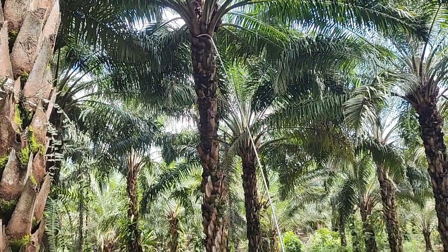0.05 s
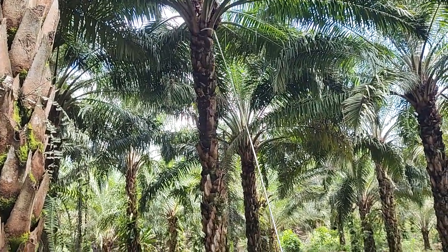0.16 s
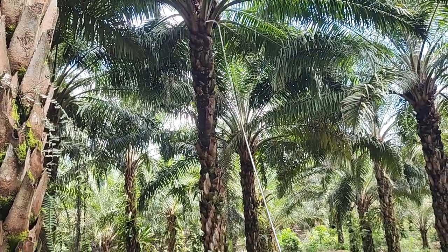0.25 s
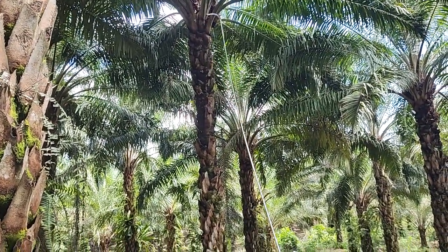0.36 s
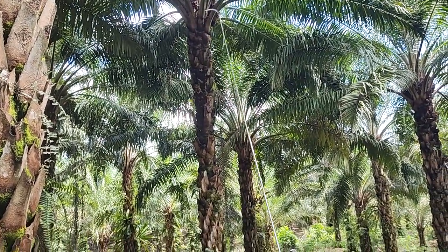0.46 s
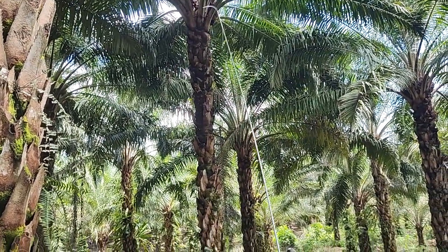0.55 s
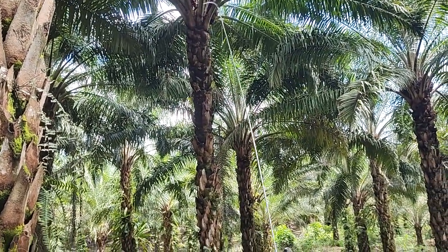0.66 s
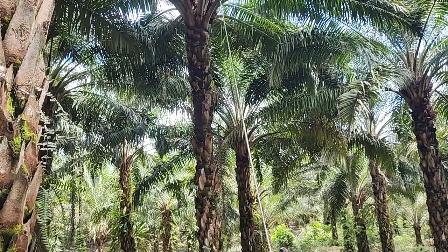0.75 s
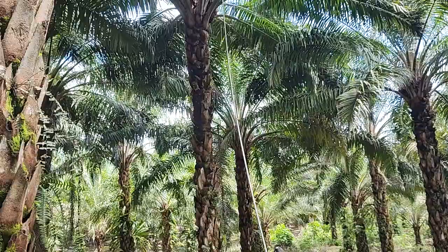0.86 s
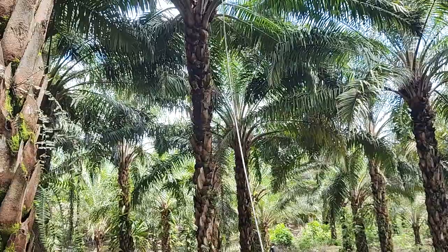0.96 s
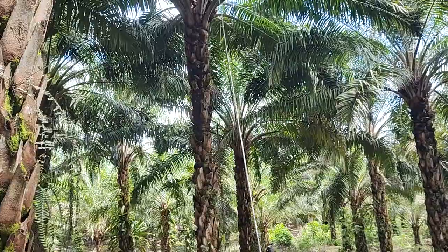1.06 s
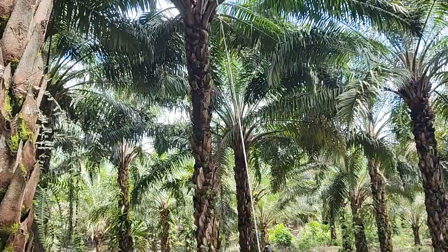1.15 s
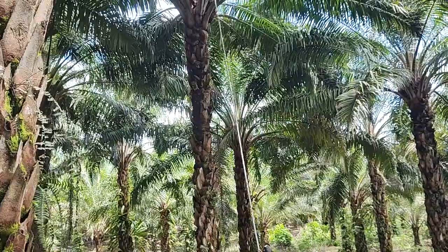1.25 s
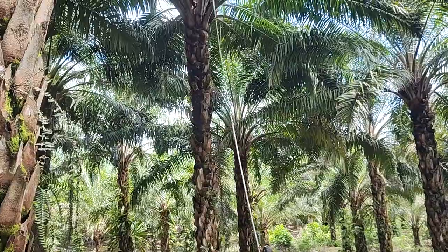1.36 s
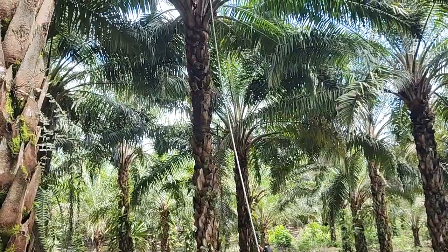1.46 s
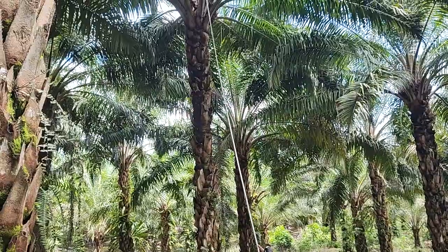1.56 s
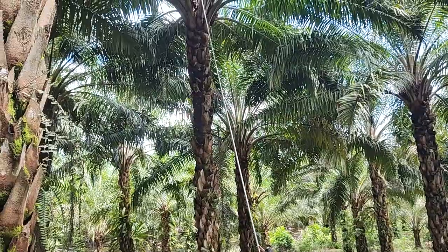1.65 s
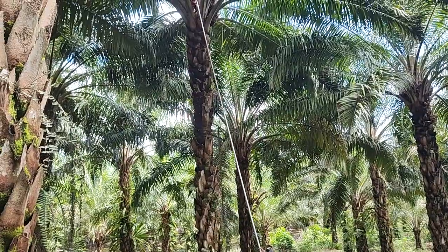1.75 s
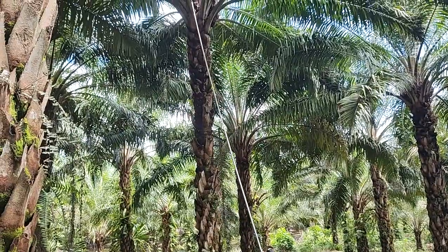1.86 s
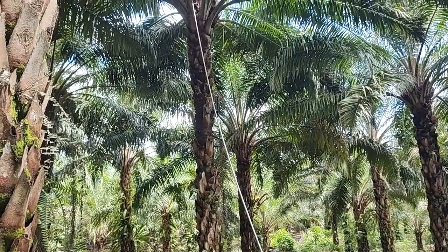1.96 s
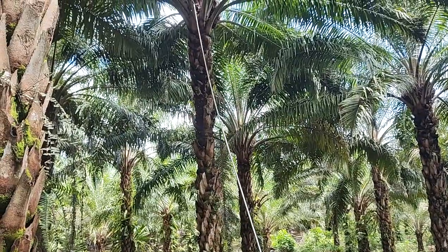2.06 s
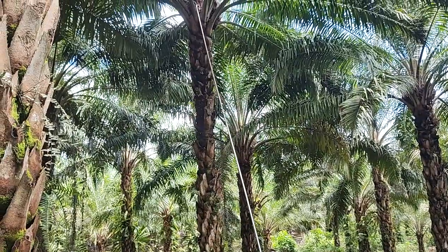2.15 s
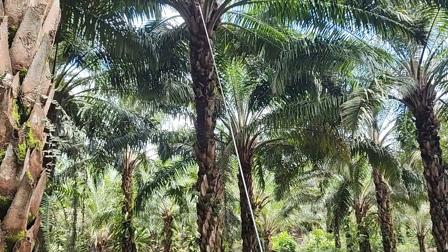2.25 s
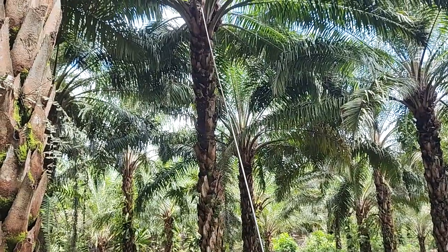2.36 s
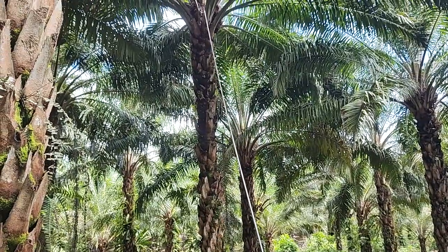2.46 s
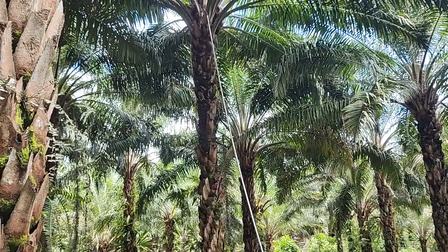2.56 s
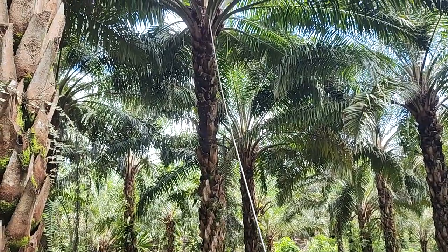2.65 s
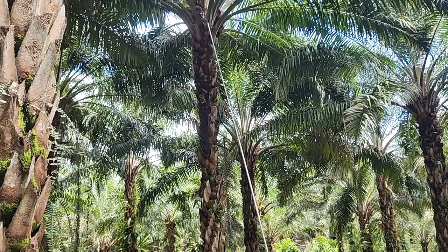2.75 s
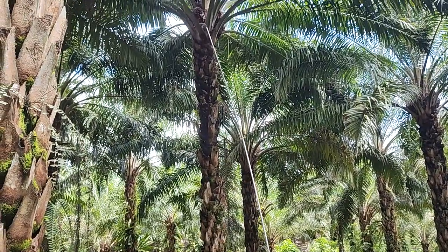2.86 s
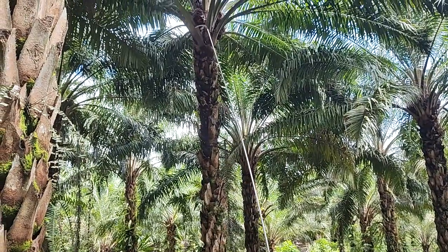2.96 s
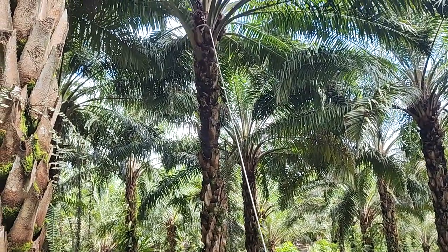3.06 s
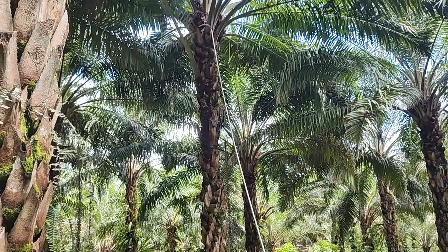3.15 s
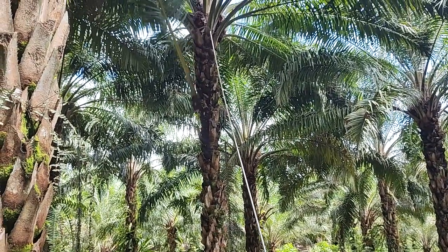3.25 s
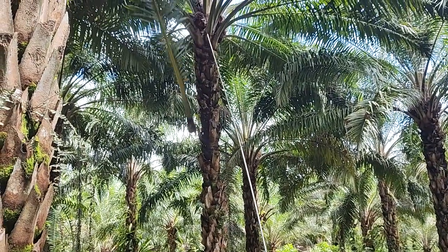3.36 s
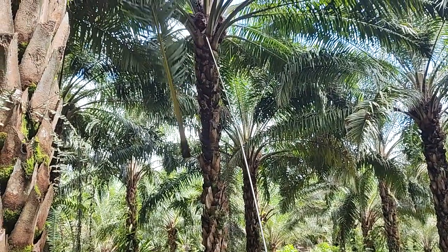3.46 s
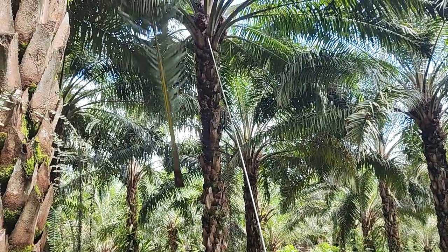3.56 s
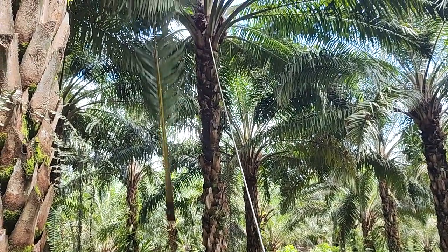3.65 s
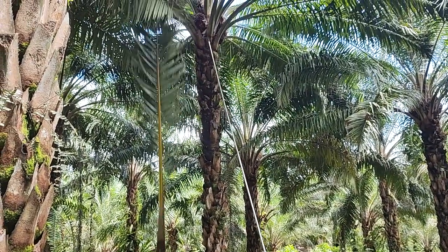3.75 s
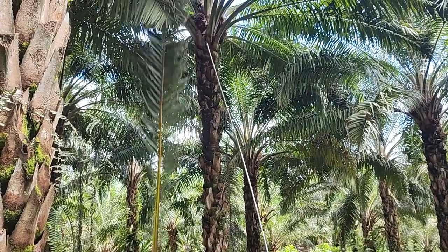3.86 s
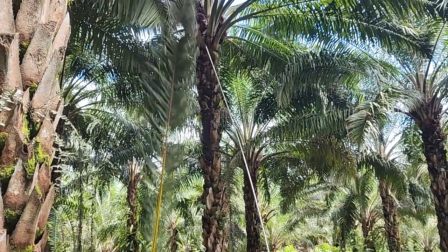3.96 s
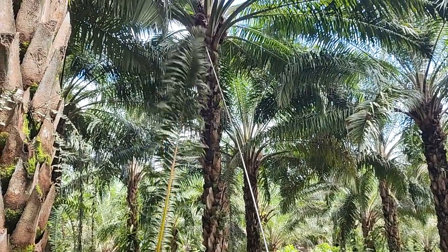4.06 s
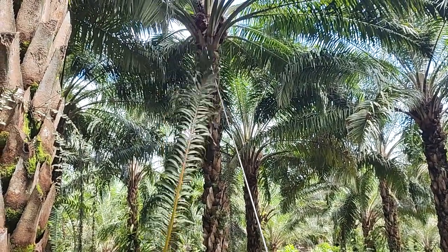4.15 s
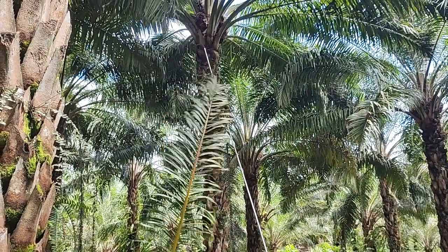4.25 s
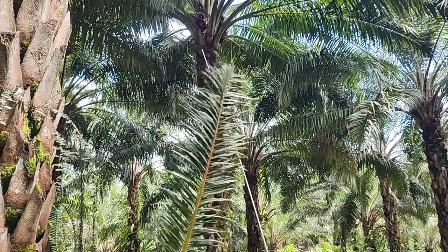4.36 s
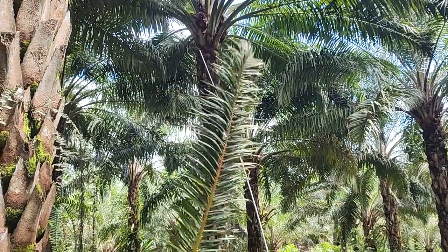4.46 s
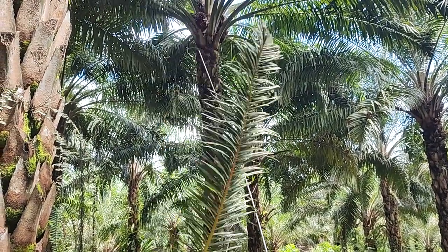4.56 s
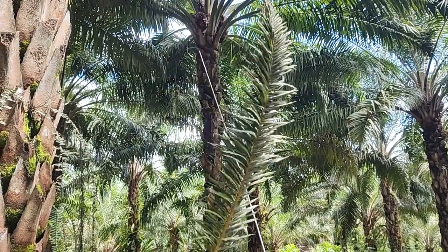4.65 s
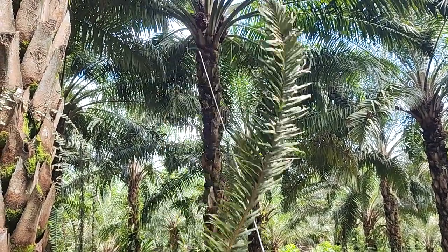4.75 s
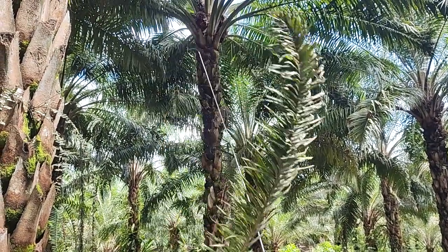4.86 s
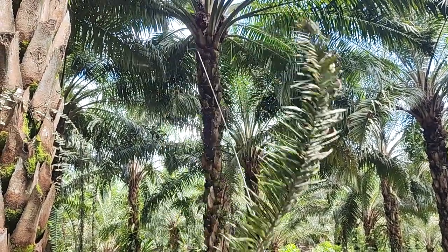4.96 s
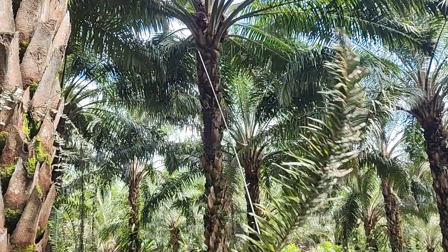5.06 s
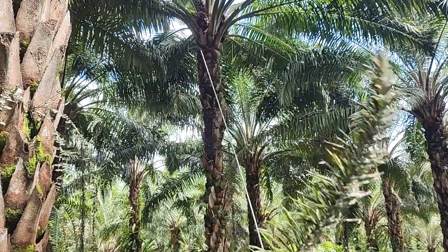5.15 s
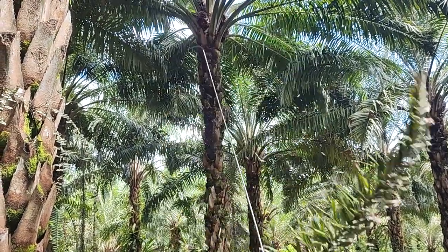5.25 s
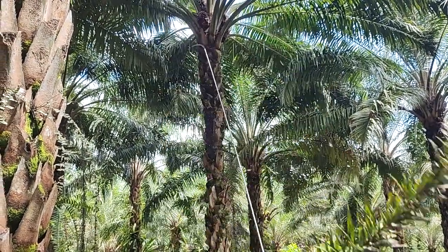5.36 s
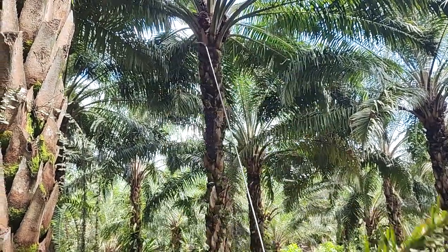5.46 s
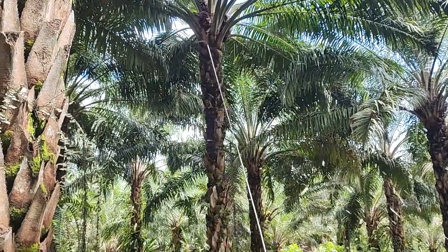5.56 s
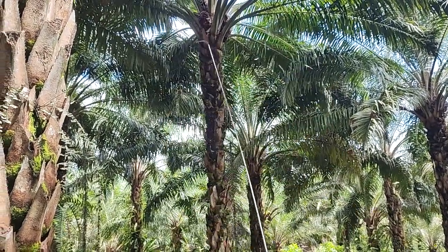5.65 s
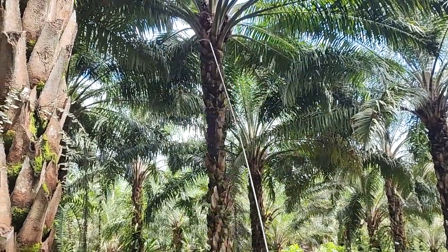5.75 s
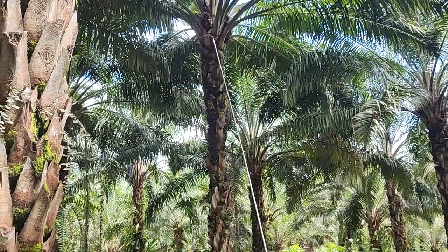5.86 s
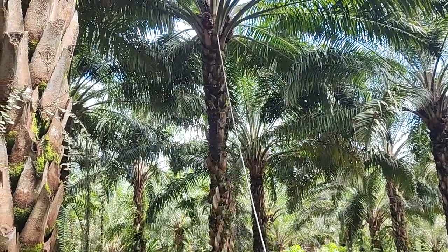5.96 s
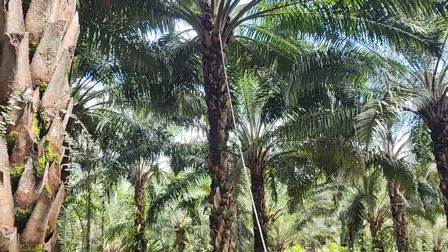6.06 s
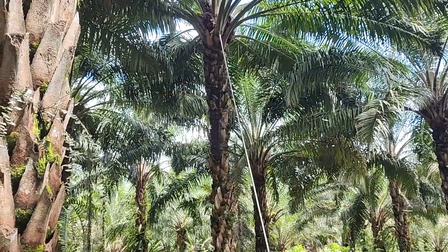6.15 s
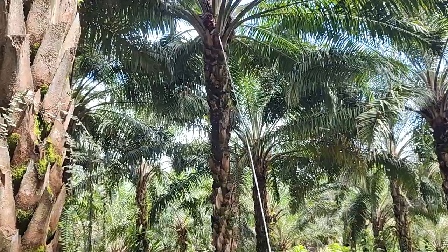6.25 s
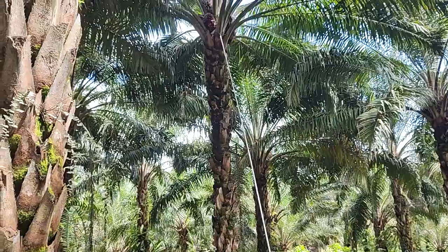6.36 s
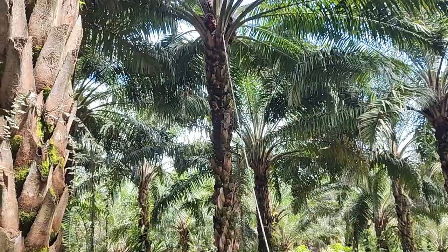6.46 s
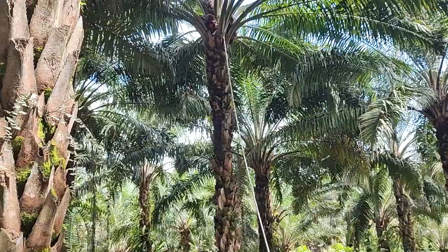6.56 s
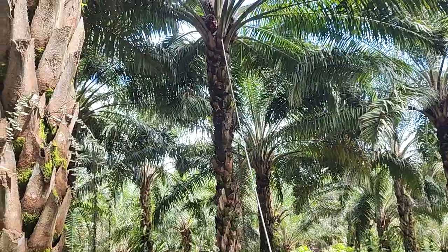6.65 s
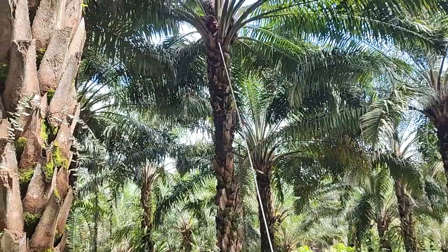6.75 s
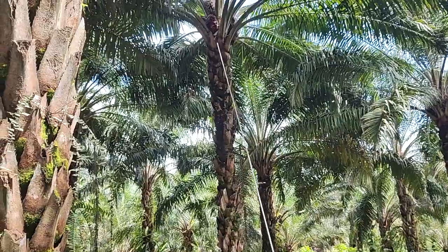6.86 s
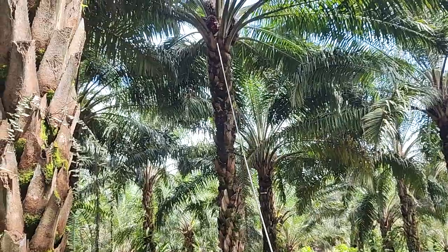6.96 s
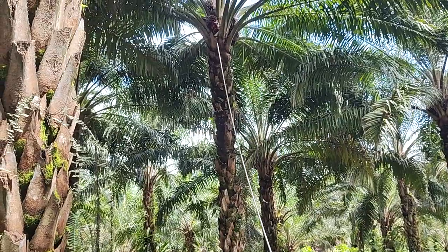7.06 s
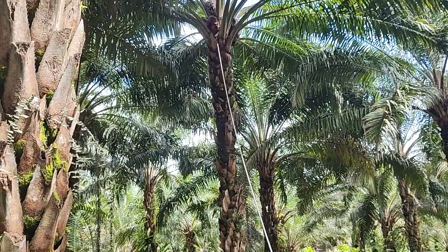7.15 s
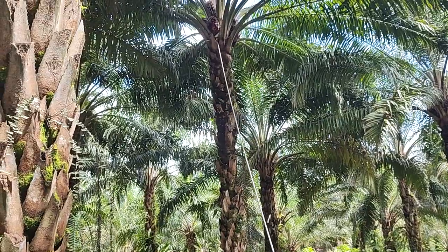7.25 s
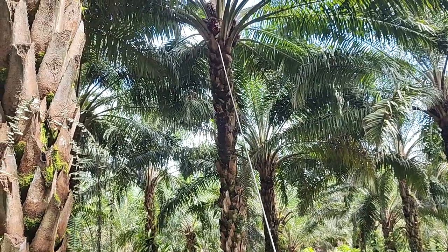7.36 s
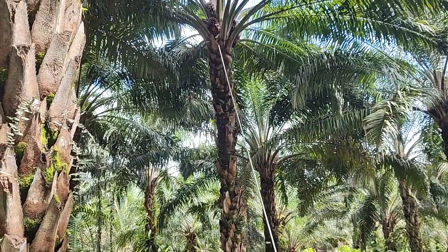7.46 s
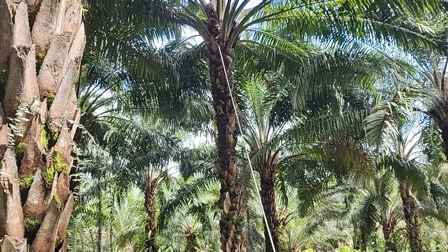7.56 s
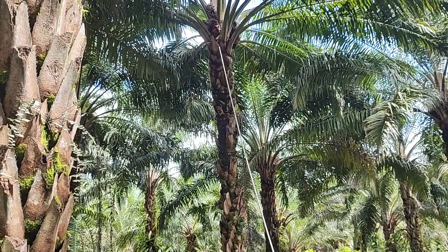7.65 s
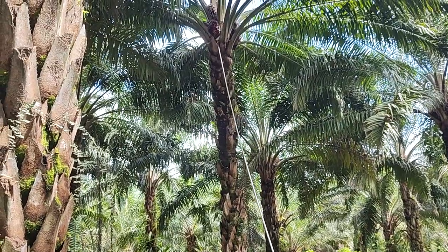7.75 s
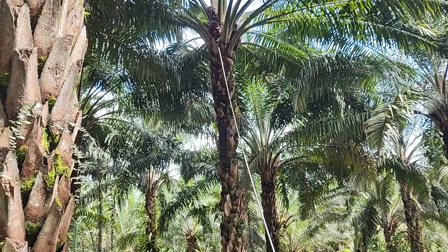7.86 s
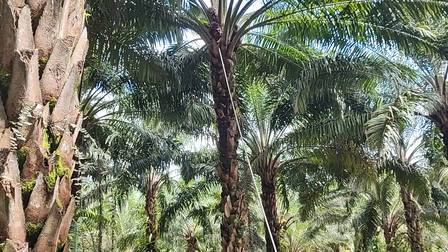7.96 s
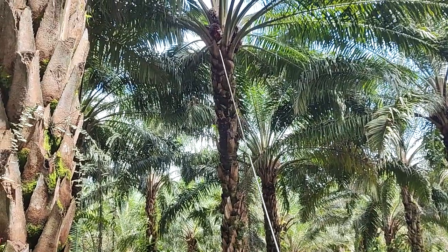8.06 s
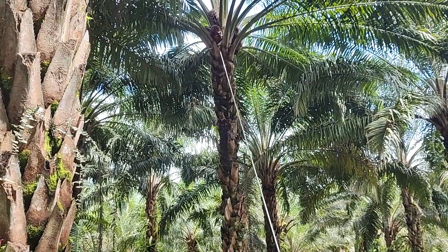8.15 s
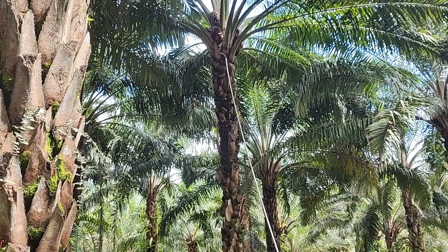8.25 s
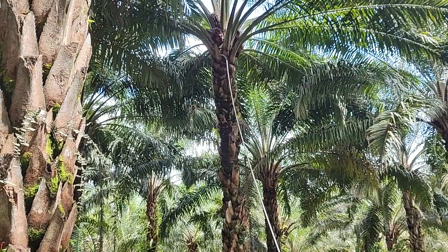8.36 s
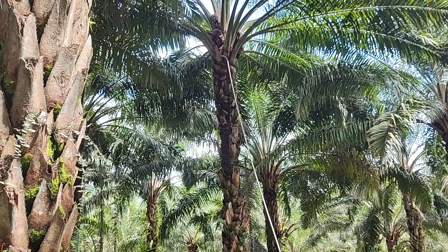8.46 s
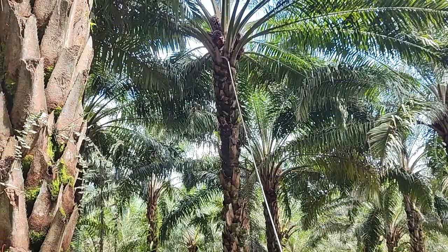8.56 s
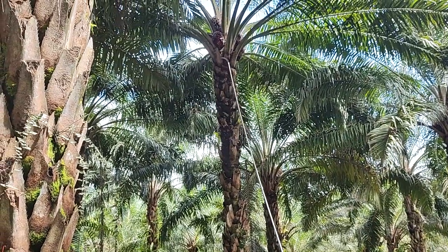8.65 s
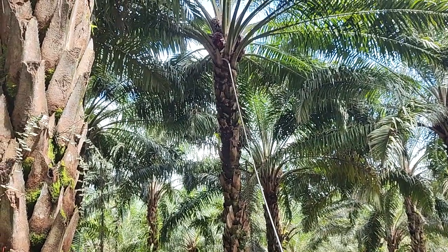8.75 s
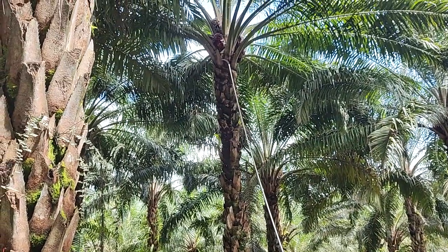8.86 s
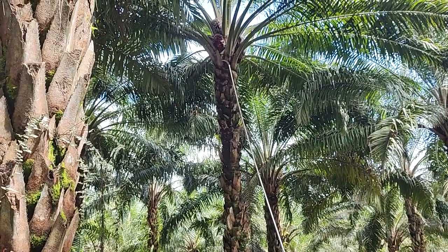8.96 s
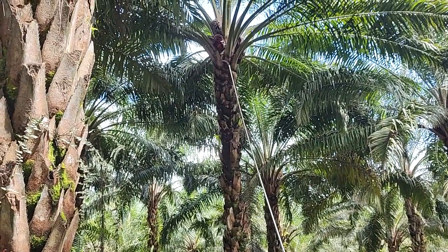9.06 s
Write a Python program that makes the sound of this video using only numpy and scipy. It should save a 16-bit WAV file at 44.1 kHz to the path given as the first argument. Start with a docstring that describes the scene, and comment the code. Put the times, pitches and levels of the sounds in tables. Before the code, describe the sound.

A steady, fluttering cicada hiss, mostly around 7-8 kHz and stronger at right, lies over faint low air rumble. At 0 s a light pole tap and brief rustle fade; a distant bird gives short falling whistles about every 0.4 s until 2.6, with softer pipes. Around 1.9-2.2 s come sharp woody knocks and clacks, then gentle rustling and small dry cracks near 3. Foliage swells from 3, with dull stalk knocks at 3.6-3.9 and the loudest deep thud at 4.1, bursting into a dense leafy swish that fades by 5. Nearby cicadas thin meanwhile. A second swish with knocks comes at 5.6, thumps and a crack at 6.1. Hollow clacks follow at 6.7-6.9, 7.3 and 7.9, with hoarse chirps and a faint low hum around 7.3. A crunchy litter scuff and knock at 8.3-8.4 settle into insects and sparse soft bird notes until about 9.

```python
"""A worker cuts a palm frond with a sickle on a long pole, in a plantation full of cicadas.
The pole clacks: bursts of contact noise set its ringing tones going. The frond tears loose, brushes down,
lands on its butt and topples: dull damped tones make its thuds, noise and tiny snaps its swishes.
More clacks, dry cracks and a scuff in litter follow, all built from filtered snaps and noise.
Behind them, sliding tones make far birds and a low hum, and noise makes cicadas and open air."""
import sys
import numpy as np
from scipy import signal
from scipy.fft import rfft, irfft
from scipy.io import wavfile

SR = 44100
rng = np.random.default_rng(int(sys.argv[2]) if len(sys.argv) > 2 else 0)


def int16_out(signal):
    """Quantize to a 16-bit WAV file."""
    q = np.round(np.clip(np.atleast_2d(signal).T, -1, 1) * 32767)
    wavfile.write(sys.argv[1], SR, q.astype(np.int16))


N = 401310
T = np.arange(N) / SR  # time [s]
HZ = np.fft.rfftfreq(N, 1 / SR)  # frequency [Hz]

# Levels in the tables are relative: the sources below balance them.
# strikes and drags of the pole:
# (time [s], level [dB], contact time [s], rasp [dB], favoured frequency [Hz], spread [octaves])
POLE_CLACKS = [(0.002, -40.5, 0.013, 3, 750, 0.73), (0.045, -42.5, 0.0083, 0, 1500, 1.5),
               (1.973, -30.5, .009, -2, 1600, .14), (2.0915, -29.5, .0016, 1, 1050, 0.69),
               (5.016, -48, .004, -5, 2300, 0.41), (6.713, -41, 0.014, -6, 1300, 0.41),
               (6.746, -39.5, .041, -10, 1300, 1.2), (6.802, -31.5, .011, 1.5, 1050, 0.53),
               (6.921, -45, .006, -8, 950, .37), (7.34, -33, 0.012, 0, 1400, .36),
               (7.415, -51, .016, -3, 1200, 1), (7.852, -52, .01, 6, 1200, .9),
               (7.9, -50, 0.0083, 4, 1400, 1), (7.936, -42, 0.01, 3, 1300, 1.2)]
# ringing of the pole: (frequency [Hz], level [dB], time to fall 60 dB [s])
POLE_MODES = [(404, -45, 0.035), (696, -20, 0.047), (997, -2, 0.077), (1250, 0.5, 0.023),
              (1560, 3.5, 0.035), (2067, -7.5, 0.05), (2560, -4, 0.043), (3010, 8.5, 0.0051),
              (3990, -3, 0.028), (4310, -5, 0.065)]
# heavy stalks hit wood or soil: (time [s], level [dB], pitch factor [1], push on the ground [dB])
STALK_HITS = [(0.468, -36.5, .73, 6), (1.8902, -19.5, 1.05, -24), (1.931, -34, 1.4, -20),
              (1.987, -30, 1.04, -24), (2.168, -38, .8, -18), (3.614, -16, 0.96, -6),
              (3.662, -14, 0.91, -15), (3.685, -26, .33, -4), (3.852, -21, .68, -4),
              (3.874, -14.5, .78, -4), (4.0984, -1, 0.93, -1.5), (4.616, -26.5, 1, -10),
              (5.372, -34, 0.91, -16), (5.431, -34.5, 1.16, -21), (5.628, -23, 1.0, -22),
              (5.825, -21.5, 0.93, -22), (5.854, -25, .85, -6), (6.058, -18, 1.1, -4),
              (6.064, -20, .33, -1), (6.088, -24.5, .27, -9), (6.11, -27, .9, -8), (6.205, -26.5, .8, -10),
              (6.927, -32, 0.49, -12), (7.945, -37.5, .27, -3), (8.374, -22, .45, -22)]
# the springy stalk touches again: (delay [s], level change [dB], pitch factor [1])
STALK_BOUNCES = [(.008, -10.5, 0.876), (.033, -19, .9)]
# ringing of a stalk at pitch factor 1: (frequency [Hz], level [dB], time to fall 60 dB [s])
STALK_RINGING = [(389, -18.5, 0.058), (763, 2, 0.017), (1066, -7.5, 0.027)]
# ringing of the soil: (frequency [Hz], level [dB], time to fall 60 dB [s])
GROUND_RINGING = [(60, -18, 0.24), (149, -10.5, 0.028), (236, -2.5, 0.02)]
# the foliage swishes and settles:
# (time at full swing [s], rise [s], hold [s], fade [s], leaflet level [dB], stalk level [dB])
FOLIAGE_SWISHES = [(0.0, .05, .02, .3, -45, -47.5), (.1, .3, .05, 1.3, -59.5, -64),
                   (1.907, 0.045, 0.95, .5, -50, -53), (2.867, .09, 0.24, 0.94, -44, -66),
                   (3.602, 1.19, 0.3, .42, -35, -37), (4.133, .03, 0.067, 0.39, -40, -27),
                   (4.22, 0.14, 0.044, 0.44, -28.7, -33), (4.798, 0.36, .5, 1.4, -55.5, -53.5),
                   (5.454, .6, 0.18, .3, -52.5, -51), (5.629, .05, 0.035, 1.2, -36, -37),
                   (6.06, 0.16, .15, 0.17, -40, -41), (6.827, 0.16, .02, 0.35, -48, -58),
                   (7.1, .2, .06, .3, -60, -58), (7.38, 0.2, .01, .27, -50, -57),
                   (7.936, 0.32, .01, .24, -53, -53.5)]
# tone colour of leaflets: (frequency [Hz], level per Hz [dB])
LEAFLET_COLOUR = [(500, -28), (1100, -7.5), (2300, 1.5), (4200, 2), (5200, -2), (7000, 0.5), (9500, -4.5),
                  (10800, -6.5), (11900, -3.5), (13200, -8.5), (16000, -14.5)]
# tone colour of rustling stalks: (frequency [Hz], level per Hz [dB])
STALK_COLOUR = [(30, -61), (80, -15), (160, 2), (300, 1), (450, -2), (700, 2), (1050, 1), (1400, -3.5),
                (2500, -5), (6000, -50)]
# tone colour of crushed litter and fibres: (frequency [Hz], level per Hz [dB])
LITTER_COLOUR = [(50, -34), (150, -6), (280, -5.5), (450, -1.5), (700, 3), (1150, 3), (1500, -4),
                 (2200, -6.5), (4000, -36), (8000, -45)]
# a scuff in dry litter; rows are its leaves, their settling and the crunch:
# (time at full swing [s], rise [s], hold [s], fade [s], level [dB])
LITTER_SCUFF = [(8.316, .03, .068, .08, -31), (8.38, .08, .03, .23, -37.5), (8.314, .027, .068, .07, -29)]
# dry fibres crack: (time [s], level [dB])
FIBRE_CRACKS = [(2.991, -31), (3.158, -36), (5.481, -39), (6.06, -29), (8.371, -25)]
# cicada choruses:
# (centre [Hz], half width [Hz], level [dB], change once the nearest group has stopped [dB])
CICADA_BANDS = [(5660, 307, -51.5, -0.5), (7265, 220, -44, 1), (7784, 280, -43, -2), (8250, 62, -49, -20.5),
                (8980, 490, -64, 0.5), (11700, 180, -75, -3), (15100, 630, -59.5, 0.5)]
# the nearest cicada group: (time [s], share singing [0-1])
NEAR_CICADAS = [(0, 0.98), (2.6, 1), (3.6, 0), (4.6, 0.4), (9.1, 0.02)]
# one far bird repeats a falling whistle: (time [s], level [dB])
BIRD_WHISTLES = [(.315, -52), (.702, -50), (1.06, -50), (1.443, -50.5), (1.823, -51), (2.215, -50.5),
                 (2.638, -53), (5.11, -55)]
# its shape: (length [s], start pitch [Hz], end pitch [Hz], roughness [0-1])
WHISTLE_SHAPE = (0.079, 1172, 1005, 0.094)
# another bird holds a soft, nearly level note: (time [s], level [dB])
BIRD_PIPES = [(.138, -64), (.48, -63), (.6, -64), (.9, -60), (7.728, -64), (8.138, -65), (8.57, -65),
              (8.983, -63)]
# its shape: (length [s], start pitch [Hz], end pitch [Hz], roughness [0-1])
PIPE_SHAPE = (.1, 1215, 1228, .1)
# hoarse chirps: (time [s], length [s], start pitch [Hz], end pitch [Hz], level [dB])
BIRD_CHIRPS = [(1.571, .034, 2400, 2210, -53.5), (1.669, 0.06, 2390, 2170, -56),
               (1.66, .1, 3420, 3300, -59), (4.761, .146, 4150, 4220, -52.5),
               (5.328, 0.045, 2630, 2810, -52), (7.004, 0.034, 2470, 2150, -54),
               (7.166, .054, 2120, 2510, -54), (7.405, .047, 2180, 2450, -52),
               (7.59, 0.13, 2490, 2835, -57), (7.608, 0.086, 3330, 3730, -56)]
# a low hum that swells briefly: (time [s], middle pitch [Hz], level [dB])
HUM_PATH = [(6.85, 54, -72), (7.1, 56.7, -53), (7.3, 60.4, -49), (7.5, 57.1, -51.5), (7.75, 55, -63)]
# tones within the hum: (multiple of its pitch [1], level [dB])
HUM_TONES = [(1, -0.5), (2, -6), (2.5, -8)]
# tone colour of distant air: (frequency [Hz], level per Hz [dB])
AIR_COLOUR = [(20, 1.5), (45, -2.5), (95, 2), (160, -7.5), (300, -12.5), (700, -16), (1500, -19.5),
              (4200, -23.5), (9000, -22), (15000, -41)]
# how long the grove's echo lasts: (frequency [Hz], time to fall 60 dB [s])
GROVE_DECAY = [(100, 1), (500, 0.73), (1500, 0.67), (5000, 0.75), (14000, 0.11)]
# how alike left and right are: (frequency [Hz], coherence [0-1])
LEFT_RIGHT_LIKENESS = [(50, 0.47), (250, 0.76), (600, 0.62), (1100, 0.14), (2000, 0), (4000, 0.053)]
# the left microphone is muffled in the treble: (frequency [Hz], left minus right [dB])
LEFT_SHADE = [(100, -3), (300, -2), (1000, -3.5), (2500, -3), (5000, -1.5), (6500, -4), (7400, -14.5),
              (8500, -29.5), (10000, -14.5), (12000, -16.5), (15000, -3)]


def amp(db):
    """Turns decibels into gain."""
    return 10 ** (np.asarray(db) / 20)


def unit(x):
    """Scales a sound, or the middle of a stereo pair, to rms 1."""
    middle = np.atleast_2d(x).mean(0)
    return x / np.sqrt(np.mean(middle ** 2) + 1e-20)


def read(points, hz):
    """Reads a table along a log-frequency axis."""
    f, value = np.transpose(points)
    return np.interp(np.log(hz + 1), np.log(f), value)


def add(mix, s, sound):
    """Mixes a sound in at time s."""
    part = mix[..., max(round(s * SR), 0):][..., :sound.shape[-1]]
    part += sound[..., :part.shape[-1]]


def drift(rate_hz):
    """Wanders at random with rms 1, mostly slower than rate_hz."""
    return unit(irfft(rfft(rng.standard_normal(N)) / (1 + (HZ / rate_hz) ** 4), N))


def treble(edge_hz):
    """Gives a gentle filter curve that holds back what lies below edge_hz."""
    return HZ ** 2 / (HZ ** 2 + edge_hz ** 2)


def diffuse(pair, gain=1):
    """Colours two unrelated signals and blends their bass, as at two close microphones."""
    a, b = rfft(pair)
    angle = np.arcsin(np.clip(read(LEFT_RIGHT_LIKENESS, HZ), 0, 1)) / 2
    left = a * np.cos(angle) + b * np.sin(angle)
    right = b * np.cos(angle) + a * np.sin(angle)
    return irfft(gain * np.array([left, right]), N)


def ring(modes, pitch=1):
    """Sounds the fading tones of a solid thing after one blow."""
    t = T[:SR // 4]
    return sum(amp(db - 60 * t / t60) * np.sin(2 * np.pi * hz * pitch * t) for hz, db, t60 in modes)


def crackle(per_s, spread_db, wash):
    """Scatters tiny snaps of uneven size over a wash of sliding contact."""
    size = amp(spread_db * np.minimum(rng.exponential(1, (2, N)), 4))
    snaps = size * rng.choice([-1, 1], (2, N)) * (rng.random((2, N)) < per_s / SR)
    return snaps / snaps.std() + wash * rng.standard_normal((2, N))


def swell(s, rise, hold, fade):
    """Gives a gain that rises to full at time s, holds and dies away."""
    range_db = 20.5  # a rise or a fade covers this much in its time
    return amp(-range_db * (np.maximum(s - T, 0) / rise + np.maximum(T - s - hold, 0) / fade))


def grove(x, onset_s=0.0055):
    """Trunks and crowns scatter sound back in a thin tail of random echoes."""
    taps = rng.standard_normal((2, SR)) * (rng.random((2, SR)) < 2500 / SR)
    hz, t, z = signal.stft(taps, SR, nperseg=256)
    fade = amp(-60 * t / read(GROVE_DECAY, hz)[:, None])
    z = z * fade * (1 - np.exp(-t / onset_s))
    tail = signal.istft(z, SR, nperseg=256)[1]
    tail /= np.linalg.norm(tail[0])
    return diffuse(signal.fftconvolve(x[None], tail, axes=1)[:, :N])


def contacts():
    """Each stroke of the pole is a bright bite of the blade, the main blow and a weak rattle."""
    for s, db, contact, rasp_db, favoured_hz, spread in POLE_CLACKS:
        yield s - .003, db - 6, .0033, rasp_db, 2900, .5
        yield s, db, contact, rasp_db, favoured_hz, spread
        yield s + .033, db - 17.5, contact, rasp_db, favoured_hz, spread


def pole(scrape_db=-7, release_s=0.0069, strike=1.0, splinter_db=-6, splinter_low_hz=480):
    """The blade strikes and chatters on the stalk: the pole rings, fibres splinter and rasp."""
    out, t = np.zeros((2, N)), T[:SR // 4]
    chatter = crackle(per_s=1700, spread_db=0.0, wash=0.29)
    rasp = unit(diffuse(chatter, amp(read(LEAFLET_COLOUR, HZ))))
    splinters = unit(diffuse(chatter, amp(read(LITTER_COLOUR, HZ)) * treble(splinter_low_hz)))
    for s, db, contact, rasp_db, favoured_hz, spread in contacts():
        grip = np.minimum(t / (contact / 2), 1) * np.exp(-np.maximum(t - contact, 0) / release_s)
        part = max(round(s * SR), 0) + np.arange(len(t))
        force = grip * chatter[0, part]
        # brief contacts are mostly one blow
        force[0] += strike * np.linalg.norm(force) * release_s / (release_s + contact)
        # the place of contact decides which modes ring most
        modes = []
        for hz, mode_db, t60 in POLE_MODES:
            octaves_off = np.log2(hz / favoured_hz)
            modes.append((hz, mode_db - 10 * np.log10(1 + (octaves_off / spread) ** 2), t60))
        tone = signal.fftconvolve(force, ring(modes))[:len(t)]
        tone *= np.linalg.norm(grip) / np.linalg.norm(tone)
        fibres = amp(scrape_db + rasp_db) * rasp[:, part]
        fibres += amp(splinter_db) * min(spread, 1) * splinters[:, part]
        add(out, s, amp(db) * (tone + grip * fibres))
    return out + amp(-11) * grove(out.mean(0))


def blows(stalk):
    """Heavy hits bounce, and chance knocks follow the motion of the stalks."""
    for s, db, pitch, ground_db in STALK_HITS:
        yield s, db, pitch, ground_db
        for delay, bounce_db, factor in STALK_BOUNCES:
            yield s + delay, db + bounce_db, pitch * factor, ground_db
    knocks_per_s, knock_db, spread_db = 30, 3.5, 3  # level is relative to the stalk motion
    for slot, (when, size, pitch) in enumerate(rng.random((int(knocks_per_s * N / SR), 3))):
        s = (slot + when) / knocks_per_s
        motion_db = 20 * np.log10(stalk[int(s * SR)] + 1e-9)
        db = motion_db + knock_db + spread_db * (2 * size - 1)
        yield s, db, np.interp(pitch, [0, 1], (.55, 1.1)), -13


def thuds(stalk, low_hz=52, wet_db=-12, scatter_hz=110, crush_db=-24, crush_s=.008, left_db=2.0):
    """A fleshy stalk knocks short and dull and crushes fibres; a heavy fall also pushes the soil."""
    out, crush = np.zeros((2, N))
    for s, db, pitch, ground_db in blows(stalk):
        knock = ring(STALK_RINGING, pitch) + amp(ground_db) * ring(GROUND_RINGING)
        add(out, s, -amp(db) * knock)
        add(crush, s, amp(db + crush_db) * np.exp(-T[:SR // 4] / crush_s))
    contact = signal.windows.hann(round(.0007 * SR))
    out = np.convolve(out, contact / contact.sum(), "same")  # the soft contact rounds off the attack
    out = signal.sosfilt(signal.butter(2, low_hz, "high", fs=SR, output="sos"), out)
    # deep bass passes the trunks
    scattered = signal.sosfilt(signal.butter(2, scatter_hz, "high", fs=SR, output="sos"), out)
    crumbs = crackle(per_s=900, spread_db=2.0, wash=0.3)
    fibres = unit(diffuse(crumbs, amp(read(LITTER_COLOUR, HZ))))
    direct = out * amp([[left_db / 2], [-left_db / 2]])
    return direct + crush * fibres + amp(wet_db) * grove(scattered)


def stirring():
    """Tells how strongly leaflets and stalks move; overlapping swishes add in power."""
    power = np.zeros((2, N))
    for *shape, leaflet_db, stalk_db in FOLIAGE_SWISHES:
        power += (amp([[leaflet_db], [stalk_db]]) * swell(*shape)) ** 2
    return np.sqrt(power)


def foliage(leaf, stalk, leaf_db=3.5, snap_db=-7, snap_hz=6000, uneven_db=0.7, uneven_hz=14):
    """Leaflets slap and slide in a hiss that brightens with motion; stalks and litter crunch beneath."""
    colour = amp(read(LEAFLET_COLOUR, HZ))
    hiss = diffuse(crackle(per_s=4000, spread_db=2.5, wash=0.95), colour)
    snaps = diffuse(crackle(per_s=4960, spread_db=1.0, wash=0.91), colour * treble(snap_hz))
    crunch = diffuse(crackle(per_s=700, spread_db=0.0, wash=0.43), amp(read(STALK_COLOUR, HZ)))
    hard = amp(snap_db) * leaf / leaf.max()  # stronger motion snaps more
    leaf = leaf * amp(uneven_db * drift(uneven_hz))  # leaflets catch and slip in bunches
    return amp(leaf_db) * leaf * (unit(hiss) + hard * unit(snaps)) + stalk * unit(crunch)


def scuff():
    """Dry litter is crushed in one dense crunch, and its leaflets settle."""
    leaflets, settling, crushed = (amp(db) * swell(*shape) for *shape, db in LITTER_SCUFF)
    hiss = diffuse(crackle(per_s=3700, spread_db=3.5, wash=1.0), amp(read(LEAFLET_COLOUR, HZ)))
    crunch = diffuse(crackle(per_s=1500, spread_db=3.0, wash=0.45), amp(read(LITTER_COLOUR, HZ)))
    return np.hypot(leaflets, settling) * unit(hiss) + crushed * unit(crunch)


def cracks(decay_s=.005, low_hz=2200):
    """Single dry fibres break with a short, bright snap."""
    colour = amp(read(LEAFLET_COLOUR, HZ)) * treble(low_hz)
    burst = unit(diffuse(crackle(per_s=1700, spread_db=1.5, wash=0.4), colour))
    gain = np.zeros(N)
    for s, db in FIBRE_CRACKS:
        add(gain, s, amp(db) * np.exp(-T[:SR // 4] / decay_s))
    return gain * burst


def cicadas(flutter_db=0.74, flutter_hz=35, swell_db=0.2, left_db=-5.0):
    """Many sound-making drums blur into a few fluttering bands of noise, mostly from the right."""
    stopped = 1 - np.interp(T, *np.transpose(NEAR_CICADAS))
    out = np.zeros((2, N))
    for hz, width, db, change_db in CICADA_BANDS:
        resonance = (1 + ((HZ - hz) / width) ** 2 / 10) ** -3
        band = irfft(rfft(rng.standard_normal((2, N))) * resonance, N)
        level = amp(db + change_db * stopped + flutter_db * drift(flutter_hz))
        out += unit(band * amp([[left_db], [0]])) * level
    return out * amp(swell_db * drift(2.8))


def birds(echo_s=0.076, echo_db=-11, wet_db=-7, direct_db=-3):
    """Whistles and hoarse chirps swell quickly and fade, with a blurred echo from the rows of trees."""
    out, echo = np.zeros((2, N))
    jitter = .14 * drift(300)  # makes a rough voice waver in pitch
    notes = [(s, db, *WHISTLE_SHAPE) for s, db in BIRD_WHISTLES]
    notes += [(s, db, *PIPE_SHAPE) for s, db in BIRD_PIPES]
    notes += [(s, db, *shape, .38) for s, *shape, db in BIRD_CHIRPS]  # the last number is roughness
    for s, db, length, start_hz, end_hz, rough in notes:
        u = np.linspace(0, 1, round(length * SR))
        glide = start_hz + (end_hz - start_hz) * u
        hz = glide * (1 + rough * jitter[round(s * SR) - np.arange(len(u))])
        arch = np.sin(np.pi * u) * np.exp(-2 * u)
        add(out, s, amp(db) * unit(arch * np.sin(2 * np.pi * np.cumsum(hz) / SR)))
    add(echo, echo_s, amp(echo_db) * out * drift(40))
    return amp(direct_db) * (out + echo) + amp(wet_db) * grove(out)


def hum(waver=0.0172):
    """A few low tones that waver together in pitch rise and die away."""
    s, hz, db = np.transpose(HUM_PATH)
    turns = np.cumsum(np.interp(T, s, hz) * (1 + waver * drift(10.6))) / SR
    tone = sum(amp(level_db) * np.sin(2 * np.pi * k * turns) for k, level_db in HUM_TONES)
    return unit(tone) * np.interp(T, s, amp(db), left=0, right=0)


def air(level_db=-52.5, swell_db=-0.5):
    """Coloured noise gives the low rumble and faint wash of the open plantation."""
    wash = unit(diffuse(rng.standard_normal((2, N)), amp(read(AIR_COLOUR, HZ))))
    return amp(level_db + swell_db * drift(2.03)) * wash


def scene():
    """Adds the harvest work, insects, birds, hum and air together."""
    leaf, stalk = stirring()
    work = pole() + thuds(stalk) + foliage(leaf, stalk) + scuff() + cracks()
    return work + cicadas() + birds() + hum() + air()


def record(dry):
    """Two unequal microphones hear the scene; overload clips it, then the top treble is cut."""
    left = amp(read(LEFT_SHADE, HZ))
    ports = np.array([left, np.ones_like(left)]) / np.sqrt((1 + left ** 2) / 2)
    heard = np.clip(irfft(rfft(dry) * ports, N), -1, 1)
    edge_hz = 15850
    lowpass = signal.firwin(511, edge_hz, window=("kaiser", 9), fs=SR)
    return signal.oaconvolve(heard, lowpass[None], "same")


dry = scene()
out = record(dry)
int16_out(out)
```